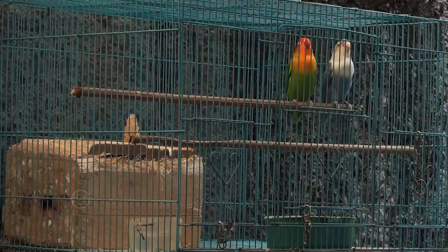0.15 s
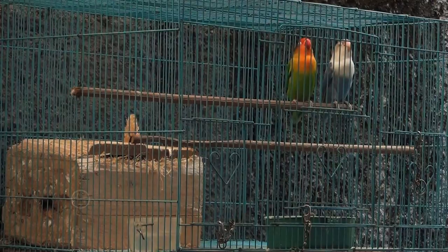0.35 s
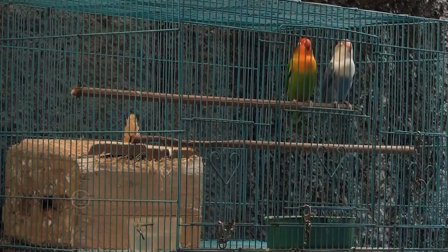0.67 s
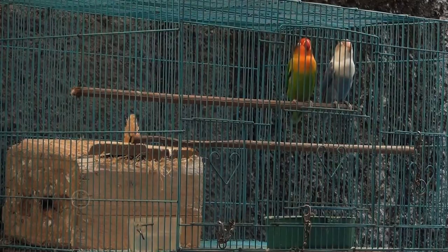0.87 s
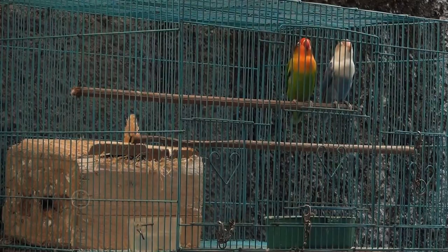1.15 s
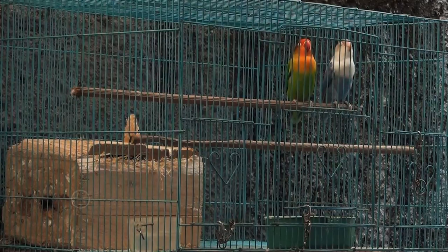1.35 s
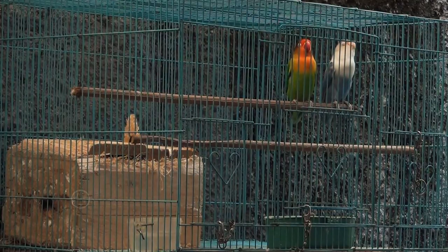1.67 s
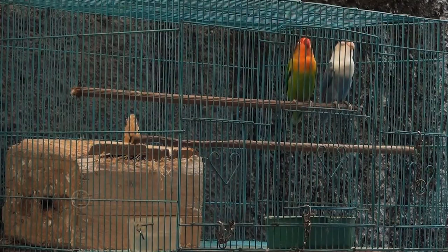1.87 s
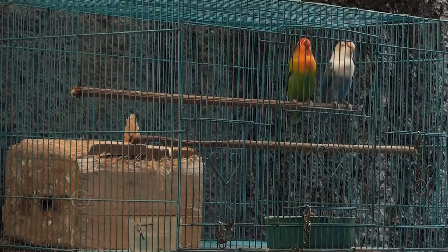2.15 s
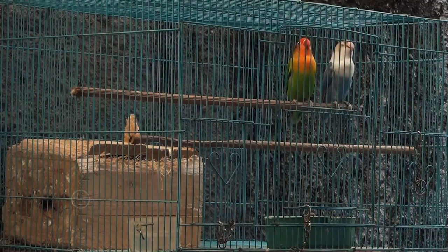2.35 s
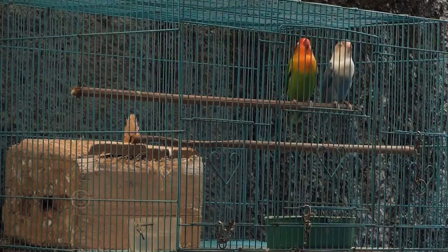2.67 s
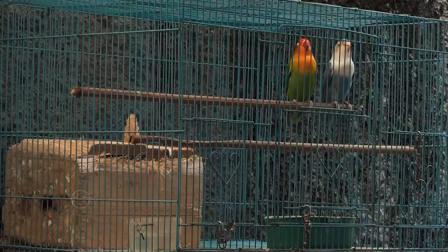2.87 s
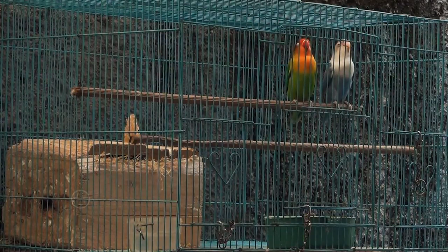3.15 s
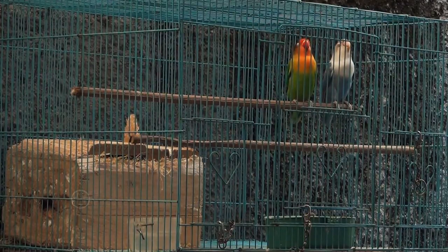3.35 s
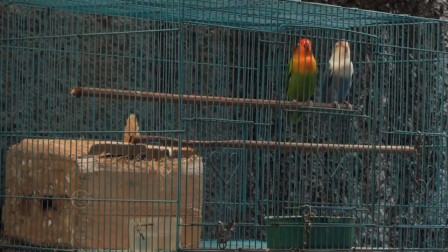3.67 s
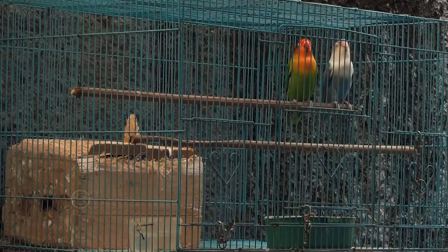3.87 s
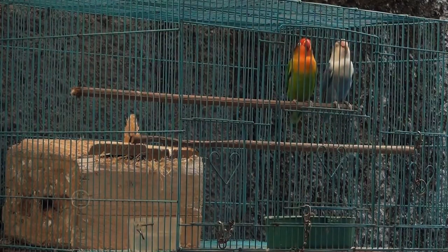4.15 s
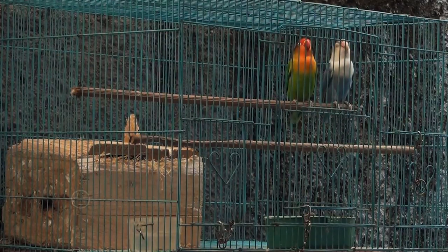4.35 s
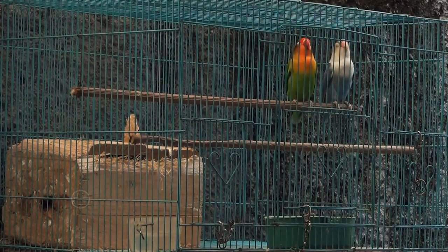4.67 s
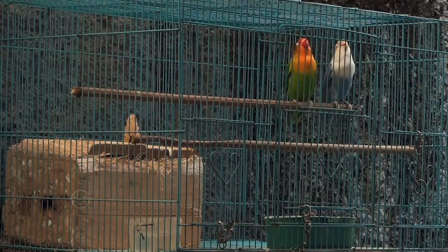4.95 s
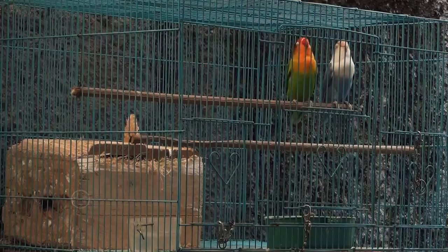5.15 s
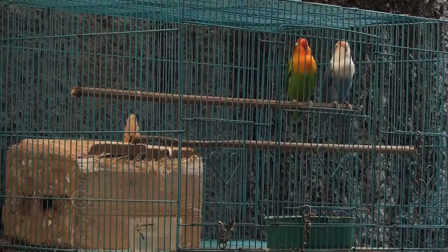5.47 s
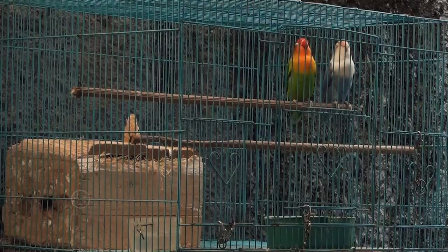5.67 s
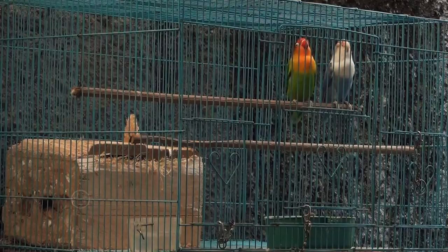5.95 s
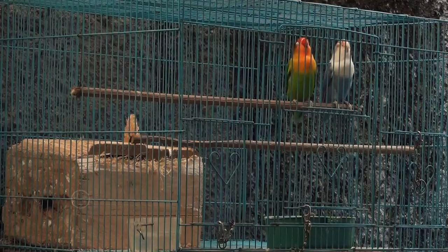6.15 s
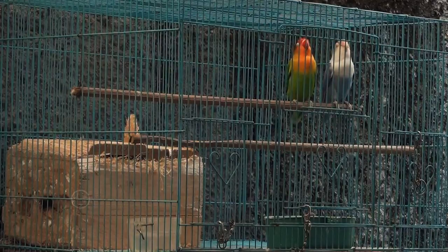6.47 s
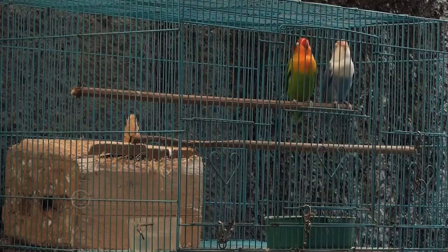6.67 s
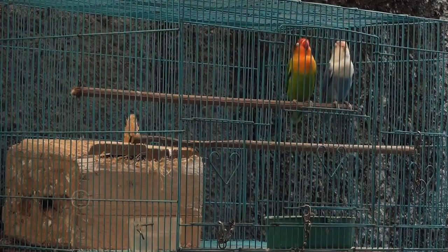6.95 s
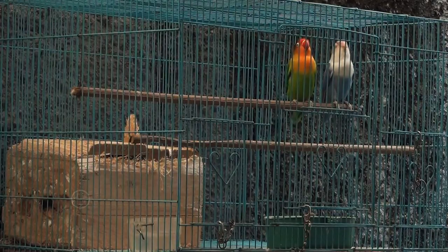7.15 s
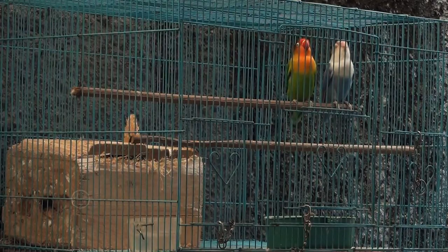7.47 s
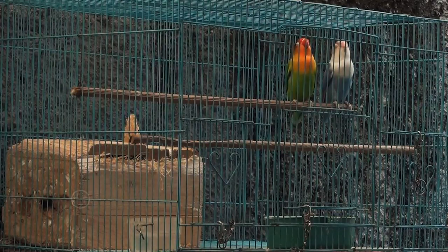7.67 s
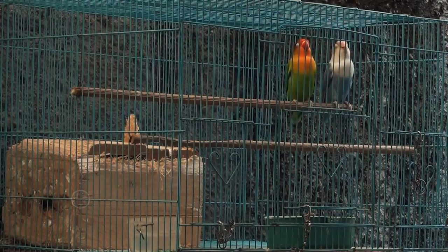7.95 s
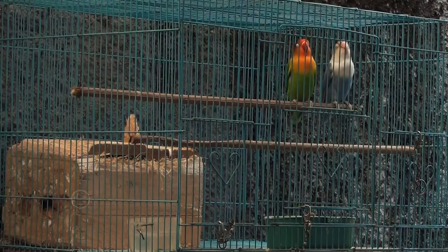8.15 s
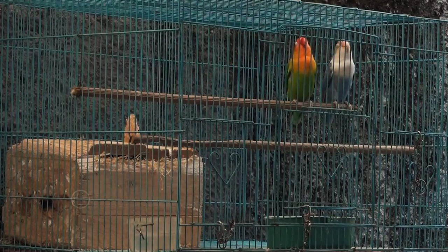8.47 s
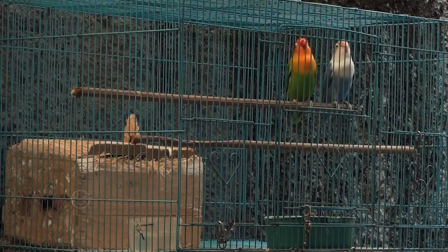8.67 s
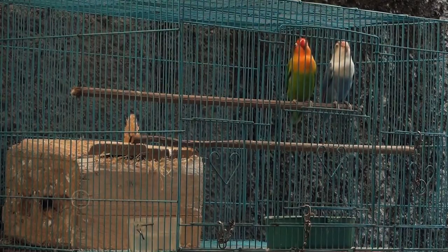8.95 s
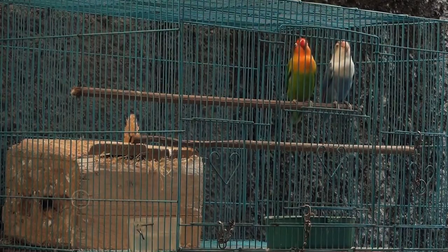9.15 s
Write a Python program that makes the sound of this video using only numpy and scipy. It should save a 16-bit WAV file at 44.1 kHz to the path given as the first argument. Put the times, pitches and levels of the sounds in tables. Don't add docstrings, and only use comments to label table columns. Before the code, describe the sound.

Two small caged parrots chatter in quick bursts of sharp, high chirps and whistles, ringing in a hard echoing space over faint distant traffic.

```python
import sys
import numpy as np
from scipy import signal
from scipy.fft import rfft, irfft, next_fast_len
from scipy.io import wavfile
from scipy.ndimage import uniform_filter1d, minimum_filter1d, map_coordinates

SR = 44100
rng = np.random.default_rng(int(sys.argv[2]) if len(sys.argv) > 2 else 0)


def store_pcm(level_fs):
    pcm = np.round(np.clip(level_fs, -1, 1) * 32767).astype(np.int16)
    wavfile.write(sys.argv[1], SR, np.atleast_2d(pcm).T)


def boost(x):
    u = np.asarray(x, float) / 20
    return 10 ** u


N = 411012
MIDDLE_HZ, MIDDLE_DB = 3000, -24


def birds():
    # t/s, length/s, pitch/Hz, level/dB
    reedy = [(3.972, .005, 1683, -42), (.535, 0.011, 3930, -21.5), (1.175, 0.015, 2027, -31.5),
             (1.243, 0.026, 3770, -36), (1.673, 0.021, 3486, -18.5), (1.763, 0.0068, 2100, -29),
             (1.774, .026, 2370, -25.5), (1.8, .018, 2580, -22), (1.902, 0.007, 2735, -22),
             (2.904, 0.013, 3555, -17.5), (3.087, 0.0079, 3060, -20.5), (3.355, .014, 2388, -24),
             (3.377, 0.0094, 2026, -34.5), (3.6, 0.015, 4673, -25), (3.982, .024, 2187, -26),
             (4.7, .022, 3066, -22), (4.749, 0.014, 4283, -32), (5.612, 0.019, 4045, -19),
             (6.09, 0.00447, 2962, -22.5), (6.725, 0.012, 2627, -24.5), (8.272, 0.045, 1793, -30),
             (8.319, 0.02, 2050, -23.5), (8.353, 0.034, 2009, -25.5), (8.465, 0.0061, 1837, -26),
             (8.472, 0.0077, 4430, -27), (8.546, .03, 3259, -18.5), (8.621, 0.0085, 4050, -27.5),
             (9.309, 0.0095, 3850, -20.5)]
    # t/s, length/s, pitch/Hz, level/dB
    pure = [(.645, 0.00794, 3050, -30), (3.558, .027, 3796, -23.5), (1.598, .018, 2850, -33),
            (2.734, .018, 3100, -21.5), (2.859, .014, 2890, -20), (4.934, .033, 4120, -22),
            (1.693, .022, 3910, -17), (1.842, .011, 4003, -24.5), (3.097, .01, 4666, -20),
            (3.108, .015, 5910, -28), (3.321, .011, 2112, -26.5), (3.43, .014, 2997, -29),
            (3.615, .013, 3445, -29), (4.694, .005, 4060, -20), (5.01, .007, 4180, -13),
            (5.067, .029, 5130, -22.5), (5.28, .014, 4950, -23), (6.584, .025, 3675, -26),
            (6.72, .005, 4810, -35), (6.892, .008, 6105, -24), (7.738, .02, 3698, -19),
            (7.77, .01, 1960, -25), (8.442, .006, 4306, -20), (8.523, .019, 3225, -18.5),
            (8.607, .006, 3083, -18)]
    # t/s, length/s, start/Hz, level/dB
    climbs = [
        (4.008, .012, 2420, -20),
        (4.676, .013, 2450, -27.5),
        (5.777, .018, 4300, -22.5),
        (6.1, 0.023, 4050, -19.5),
        (6.276, .027, 4050, -24.5),
        (6.48, .017, 4200, -23),
        (6.688, .017, 4400, -20.5),
        (8.388, .03, 2106, -26.5),
        (9.296, .013, 2670, -29),
    ]
    # t/s, length/s, start/Hz, level/dB
    sags = [
        (.655, 0.018, 3520, -30.5),
        (3.547, .011, 4060, -26),
        (4.037, 0.013, 4884, -20),
        (5.023, 0.031, 2964, -30.5),
        (5.456, .027, 4937, -24),
        (6.305, 0.03, 4570, -24),
        (8.63, 0.026, 3500, -33),
    ]
    # t/s, length/s, start/Hz, level/dB
    buzzes = [
        (3.528, .017, 2120, -35),
        (4.821, 0.051, 2399, -28.5),
        (4.873, .033, 2745, -23.5),
        (8.482, .03, 1890, -32),
    ]
    # t/s, length/s, start/Hz, level/dB
    steep = [
        (5.755, .022, 3880, -20),
        (6.91, 0.024, 3950, -22),
        (6.932, .022, 5100, -16),
        (6.67, .018, 4000, -20.5),
        (6.26, .016, 3750, -20),
    ]
    # t/s, length/s, start/Hz, level/dB
    whistles = [
        (1.196, 0.027, 3158, -22.5),
        (1.616, .014, 2780, -19),
        (1.931, 0.025, 2880, -18.5),
        (2.922, .045, 3780, -19),
        (3.052, .035, 3600, -20),
        (4.972, 0.012, 3970, -21),
        (5.214, .018, 3960, -20.5),
        (5.167, .021, 1820, -27.5),
    ]
    # t/s, start/Hz, end/Hz, level/dB
    snaps = [(.291, 2887, 3253, -21), (1.188, 4293, 4503, -23.5), (1.912, 3597, 3906, -16.5),
             (2.713, 4700, 2545, -23.5), (2.897, 4494, 3707, -15), (3.977, 1690, 2137, -26),
             (4.815, 5537, 2400, -21), (6.207, 5200, 5880, -27), (6.256, 3296, 3960, -25),
             (6.904, 4788, 3930, -22), (6.554, 1803, 1977, -23), (7.698, 2610, 2250, -27.5),
             (7.705, 2583, 4430, -22), (7.754, 4180, 5980, -19.5)]
    # t/s, start/Hz, end/Hz, level/dB
    flicks = [(.102, 1945, 2686, -22.5), (.309, 3490, 4070, -37.5), (1.229, 3592, 3056, -21.5),
              (1.63, 2560, 2364, -23), (1.92, 3303, 2865, -19), (2.678, 5230, 4060, -17),
              (2.69, 5190, 4727, -21), (3.332, 2127, 2520, -29), (3.369, 2366, 2020, -26),
              (3.59, 2710, 3190, -23), (4.052, 4600, 3846, -18.5), (4.923, 4880, 4005, -14.5),
              (4.983, 4107, 3624, -15), (5.06, 4650, 5120, -22), (5.198, 2596, 4900, -30),
              (5.238, 3970, 3687, -18), (5.439, 1940, 2293, -22.5), (5.599, 1750, 2900, -23),
              (5.629, 3984, 3300, -15.5), (6.471, 3398, 4186, -22), (6.563, 3235, 3770, -20),
              (6.574, 4454, 4830, -21), (6.705, 2290, 3670, -25), (6.737, 3150, 3410, -19.5),
              (7.688, 3530, 3036, -28), (8.448, 4350, 5206, -21.5), (8.576, 3308, 2893, -20),
              (8.597, 2028, 1896, -27.5)]
    # t/s, start/Hz, end/Hz, level/dB
    swoops = [(.517, 2006, 2350, -31), (1.66, 4465, 3590, -18.5), (1.826, 4820, 4080, -29),
              (1.956, 3174, 2820, -18.5), (1.984, 2943, 3385, -17), (2.72, 2350, 3040, -30),
              (2.768, 3600, 4130, -22.5), (2.782, 4170, 4650, -22.5), (2.845, 2287, 2795, -21),
              (3.415, 4110, 3054, -24), (4.021, 2598, 2960, -23), (4.737, 3823, 4000, -16),
              (5.254, 4700, 5770, -22.5), (7.718, 5110, 3685, -29), (8.259, 1594, 1760, -38),
              (8.42, 2407, 3050, -23.5)]
    # t/s,
    # length/s, # start/Hz, end/Hz, level/dB
    overlaps = [(0.524, 0.0084, 2310, 4020, -32), (1.187, .0036, 2100, 3400, -28),
                (1.191, .017, 1720, 1862, -31.5), (1.634, 0.015, 5110, 4798, -25),
                (1.8, 0.022, 5270, 5100, -23.5), (2.671, 0.0069, 2000, 4920, -23),
                (2.876, 0.013, 4720, 6600, -23), (3.036, 0.01, 1790, 2600, -30.5),
                (3.334, 0.0063, 2395, 4800, -32), (3.579, 0.016, 2910, 4710, -20),
                (5.023, 0.011, 1750, 2604, -31.5), (5.052, 0.012, 6500, 5900, -23.5),
                (5.446, 0.007, 2415, 5730, -17), (5.472, .01, 4600, 2250, -23),
                (5.746, .007, 2090, 2245, -28), (6.22, 0.0077, 2786, 5900, -16),
                (6.227, 0.0094, 6000, 6050, -24.5), (6.244, 0.0052, 3356, 2100, -27.5),
                (6.46, 0.009, 2270, 3416, -34), (6.66, 0.011, 2250, 2400, -34),
                (6.692, .015, 1894, 1754, -29), (6.874, 0.0083, 1775, 1900, -32),
                (6.708, 0.019, 4550, 4350, -25.5), (6.954, 0.018, 6140, 6470, -22.5),
                (7.76, 0.0089, 3594, 2050, -26), (.301, 0.0091, 2500, 3910, -30),
                (1.246, 0.0051, 3200, 4600, -25), (1.65, .014, 5900, 6200, -32.5),
                (4.752, 0.0051, 2524, 4800, -15), (4.902, 0.0049, 3000, 5000, -24),
                (5.072, .02, 4510, 4600, -23.5), (5.262, .02, 4100, 3595, -26.5),
                (3.352, 0.0086, 3900, 4295, -32.5), (3.603, .012, 4400, 3796, -31),
                (8.458, 0.032, 2500, 3600, -25), (8.49, 0.032, 4300, 3400, -23),
                (4.835, 0.031, 5000, 5500, -18)]
    # t/s, length/s, start/Hz, end/Hz,
    # level/dB
    honks = [(0.138, .03, 1633, 1553, -35), (.832, .022, 1493, 1430, -40), (1.037, .024, 1403, 1300, -48),
             (1.116, 0.02, 1400, 1490, -50), (2.435, .08, 9805, 9773, -74),
             (8.263, 0.0556, 1580, 1700, -45), (8.326, .09, 1755, 1920, -39)]
    # t/s, length/s, start/Hz, level/dB
    mutters = [
        (3.535, .01, 1719, -33.5),
        (3.554, .024, 2380, -24),
        (8.535, .02, 2170, -25.5),
        (.536, .011, 1780, -33),
        (.728, .019, 1601, -40.5),
        (4.04, .022, 2902, -29.5),
        (7.558, .015, 1786, -35.5),
    ]
    # t/s, length/s, pitch/Hz, level/dB
    earlier = [
        (.001, 0.011, 3010, -35),
        (.024, .008, 5160, -39),
        (.043, 0.0049, 3640, -39),
        (.012, 0.0067, 4400, -39),
        (.034, 0.0051, 5700, -49),
        (.05, .008, 1500, -42),
    ]
    # f/Hz, gain/dB
    beak = [(900, -14), (1400, 1.5), (2000, 3), (5000, 1), (9000, 4), (12000, -3), (16000, -22)]

    first = held(reedy, over_db=-6.5) + held(pure, over_db=-12.5)
    first += held(climbs, over_db=-4, bend=3.5) + held(sags, over_db=-9, bend=-3.5)
    first += held(buzzes, over_db=-2, bend=3.5) + held(steep, over_db=-4, bend=4.6)
    first += held(whistles, over_db=-9, bend=4.6)
    first += swept(snaps, length=.0046) + swept(flicks, length=.0085) + swept(swoops, length=.0135)
    second = [note(*row, -8.5) for row in overlaps]
    second += [note(*row, -15) for row in honks]
    second += held(mutters, over_db=-22, bend=-3)

    voice = sing(first, swell_s=.002, edge_s=.0015, rasp_db=-19)
    voice += sing(second, swell_s=.001, edge_s=.001, rasp_db=-15)
    before = sing(held(earlier, over_db=-31), swell_s=.001, edge_s=.001, rasp_db=-10)
    return filtered(boost(4.5) * np.array([voice, before]), lambda hz: boost(along(beak, hz)))


def held(rows, over_db, bend=0):
    return [note(s, length, hz, hz * (1 + bend * length), db, over_db) for s, length, hz, db in rows]


def swept(rows, length):
    return [note(s, length, hz0, hz1, db, -7) for s, hz0, hz1, db in rows]


def note(s, length, hz0, hz1, db, over_db):
    octaves = np.log2((hz0 + hz1) / 2 / MIDDLE_HZ)
    over_db = over_db - 6 * octaves - 0.48 * (db - MIDDLE_DB)
    return s, length, hz0, hz1, db, over_db


def sing(notes, swell_s, edge_s, rasp_db):
    # multiple of the pitch, level/dB
    overtones = [(2, 3.5), (3, -3.5), (4, -6.5), (5, -10.5), (6, -10.5), (7, -11)]
    slur_s = .0105
    t = np.arange(N) / SR
    s, length, hz0, hz1, db, over_db = np.transpose(sorted(notes))
    knots = np.maximum.accumulate(np.ravel([s, s + length], "F"))
    glide = uniform_filter1d(np.interp(t, knots, np.ravel([hz0, hz1], "F")), int(slur_s * SR / 3))
    slack = np.sqrt(4000 / glide)

    slurred = np.append(s[1:] - s[:-1] - length[:-1] < slur_s, False)
    end = np.where(slurred, np.append(s[1:], 0), s + length)
    now = np.clip(np.searchsorted(s, t) - 1, 0, None)
    force = boost(.7 * np.minimum(db[now] - MIDDLE_DB + 6.5, 0))
    pitch = glide * (1 + .009 * slack * np.sqrt(force) * wobble(260))

    sounding = (t > s[now]) & (t < end[now])
    lag = 1 / (abs(swell_s) * SR + 1)
    pressure = signal.lfilter([lag], [1, lag - 1], sounding) * sounding
    leap = slurred & (abs(np.log(np.append(hz0[1:], 1) / hz1)) > .13)
    broken = leap[now] & (t > (s + length)[now])
    pressure = pressure * np.where(broken, boost(-13), 1)

    def soften(x):
        return abs(uniform_filter1d(pressure * x, int(edge_s * SR) + 1))

    tone = soften(boost(db[now]))
    over = soften(boost(db[now] + over_db[now]))
    calm = 1 / (1 + (np.gradient(glide) * SR / glide / 60) ** 2)

    air_level = boost(-25) * force * over + boost(-6) * (1 - calm) * tone
    air = rng.standard_normal(N) * air_level
    air = filtered(air, lambda hz: hz ** 4 / (hz ** 4 + 2200 ** 4))

    turn = 2 * np.pi * np.cumsum(pitch) / SR
    upper = np.zeros(N)
    for k, level in overtones:
        flutter = boost(level + 1.66 * wobble(60))
        hoarse = 1 + boost(-10) * slack ** 2 * force * wobble(300 * k)
        upper += flutter * hoarse * np.sin(k * turn) * (k * pitch < SR / 2)

    rasp = 1 + boost(rasp_db + 2.5 * wobble(40)) * slack ** 2 * force * wobble(700)
    rasp += (1 - calm) * wobble(1800)
    tremor = boost(1.2 * wobble(180))
    return tremor * (rasp * (tone * np.sin(turn) + boost(-1.5) * calm * over * upper) + air)


def rustle():
    # t/s, peak level/dB
    brushes = [
        (2.5554, -50),
        (2.5786, -44),
        (2.617, -35),
        (2.627, -36),
    ]
    # f/Hz, level/dB per Hz
    feather = [(3000, -30), (6500, 4), (12000, -5), (15800, -8)]
    t = np.arange(N) / SR
    puffs = np.zeros(N)
    for s, db in brushes:
        fall_db = 60 * np.clip(t - s, 0, 1) / .09
        puffs += boost(db - 10.5 - fall_db) * (t > s)
    return puffs * unit(filtered(rng.standard_normal(N), lambda hz: boost(along(feather, hz))))


def walls(x, gap_s, rise_s):
    # f/Hz, time/s
    fade_times = [(1500, 0.59), (4000, 0.56), (8000, 0.45), (14000, 0.38)]
    out, step = np.zeros((2, N + 2 * SR)), int(.3 * SR)
    window = signal.windows.hann(2 * step, sym=False)
    padded = np.pad(x, (step, 2 * step))
    for start in range(0, N + step, step):
        hz, t, z = signal.stft(rng.standard_normal((2, int(.7 * SR))), SR, nperseg=256)
        fade = boost(-60 * t / along(fade_times, hz)[:, None])
        tail = signal.istft(z * fade, SR, nperseg=256)[1]
        delay = np.arange(tail.shape[1]) / SR
        tail *= np.clip((delay - gap_s) / rise_s, 0, 1)
        tail *= 1 + 0.63 * np.exp(-((delay - .034) / 0.0052) ** 2)
        tail /= np.linalg.norm(tail[0])
        piece = padded[start:start + 2 * step] * window
        echo = signal.fftconvolve(piece[None], tail, axes=1)
        out[:, start:start + echo.shape[1]] += echo[:, :out.shape[1] - start]
    return out[:, step:step + N]


def traffic():
    # t/s, rumble level/dB, roar level/dB
    swells = [
        (0.0, -40, -39.5),
        (1.74, -44, -40),
        (3.14, -40.5, -35),
        (5.14, -48, -43),
        (5.48, -43, -39.5),
        (9.32, -46.5, -44),
    ]
    # f/Hz, level/dB per Hz
    rumble_tone = [(13, -51), (22, -47), (59, -4), (129, 0), (205, -13), (246, -3), (300, -11), (390, -45),
                   (660, -120)]
    # f/Hz, level/dB per Hz
    roar_tone = [(110, -11.5), (180, -2), (209, -20), (321, 1), (562, -6), (652, -4), (847, -7.5),
                 (2070, -10), (5580, -29), (8100, -32.5), (15600, -40.5)]
    # f/Hz, level/dB per Hz
    tyre_tone = [(1500, -30), (2500, 0), (5000, -10), (9000, -35), (12000, -50)]
    s, rumble_db, roar_db = np.transpose(swells)
    t = np.arange(N) / SR

    def rush(spectrum):
        return unit(filtered(rng.standard_normal((2, N)), lambda hz: boost(along(spectrum, hz))))

    rumble = boost(np.interp(t, s, rumble_db) + 1.0 * wobble(2.88)) * rush(rumble_tone)
    roar = boost(np.interp(t, s, roar_db) + 3.5 + .9 * wobble(4)) * rush(roar_tone)
    passing = np.exp(-((t - 2.6) / 0.28) ** 2)
    hiss = boost(-43.5) * passing * rush(tyre_tone)
    mid, side = rumble + roar + hiss
    return stereo(mid, side, wide_db=0.0)


def stereo(mid, side, wide_db):
    # f/Hz, level/dB
    side_levels = [(60, -48), (110, -46), (200, -37.5), (380, -28.5), (700, -15.5), (1290, -12),
                   (2380, -11.5), (4400, -11), (8120, -14.5), (15000, -44)]
    side = filtered(side, lambda hz: boost(along(side_levels, hz) + wide_db))
    return np.array([mid + side, mid - side])


def unit(x):
    return x / np.sqrt(np.mean(x ** 2) + 1e-20)


def along(points, hz):
    f, v = np.transpose(points)
    return np.interp(np.log(hz + 1), np.log(f + 1), v)


def wobble(rate):
    return map_coordinates(rng.standard_normal(int(N * rate / SR) + 4), [np.arange(N) * rate / SR])


def filtered(x, response):
    m = next_fast_len(x.shape[-1] + 8192)
    return irfft(rfft(x, m) * response(np.fft.rfftfreq(m, 1 / SR)), m)[..., :x.shape[-1]]


def scene():
    # f/Hz, gain/dB
    spread = [(2000, 3.5), (5000, 6), (10000, 2.5), (15000, 6)]
    near, before = birds()
    near = near + rustle()
    echo = walls(near, gap_s=0.00024, rise_s=0.014)
    lead = SR // 20
    old_echo = walls(before, gap_s=.002, rise_s=0.012)[:, lead:]
    echo = echo + np.pad(old_echo, ((0, 0), (0, lead)))
    mid, side = filtered(echo, lambda hz: boost(along(spread, hz)))
    direct = near * boost(np.array([[1.3], [.8]]))
    return direct + stereo(mid, side, wide_db=-0.5) + traffic()


def band_limit(x):
    return signal.sosfilt(signal.butter(12, 15710, fs=SR, output="sos"), x)


def record(dry):
    power = signal.lfilter([1 / 900], [1, 1 / 900 - 1], np.mean(dry ** 2, 0))
    wet = dry * (1 + power / boost(-12.5) ** 2) ** -.25
    need = np.minimum(1, .92 / (abs(wet).max(0) + 1e-9))
    wet = wet * uniform_filter1d(minimum_filter1d(need, size=260), size=130)
    wet = filtered(wet, lambda hz: hz ** 2 / (hz ** 2 + 30 ** 2))
    return band_limit(wet)


dry = scene()
out = record(dry)
store_pcm(out)
```